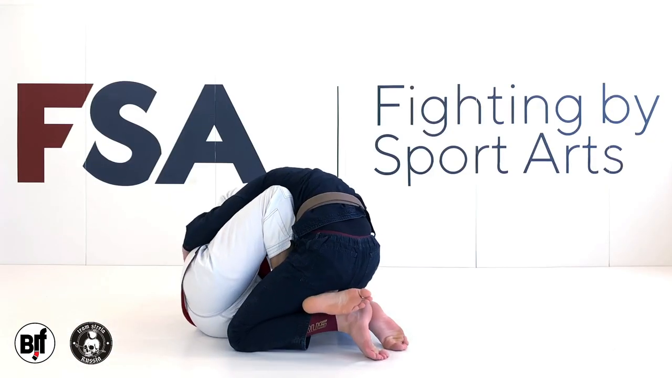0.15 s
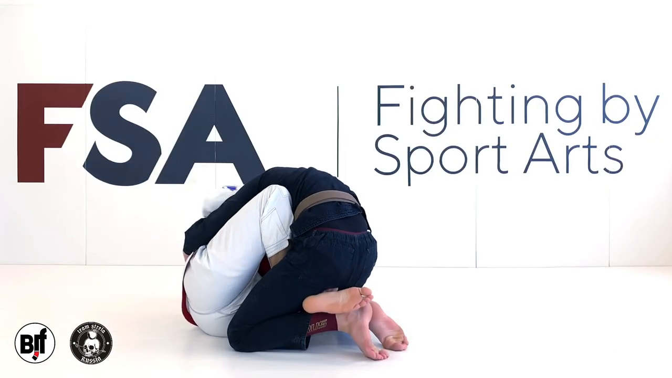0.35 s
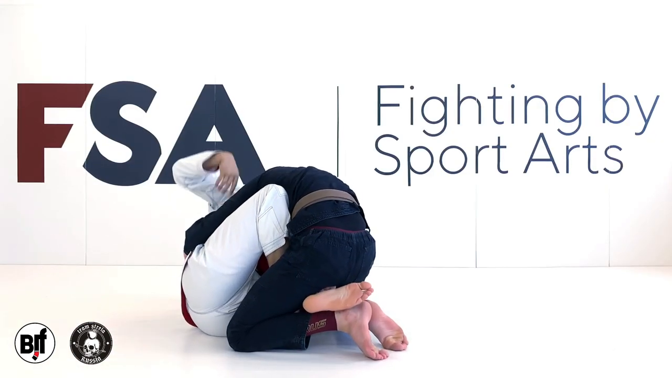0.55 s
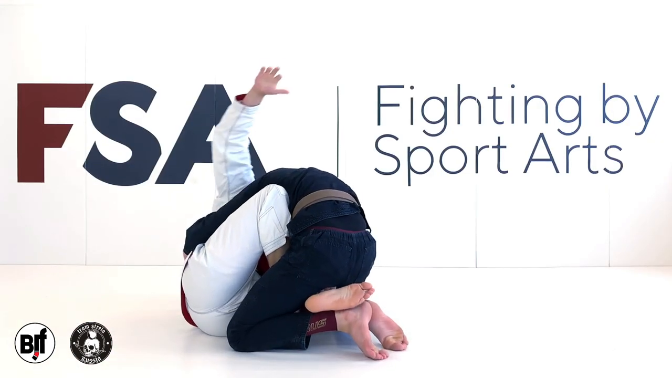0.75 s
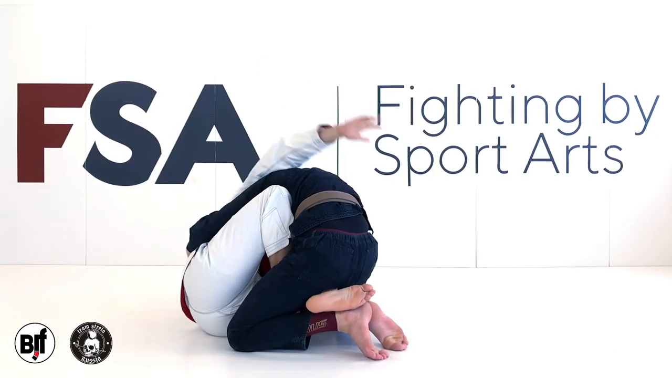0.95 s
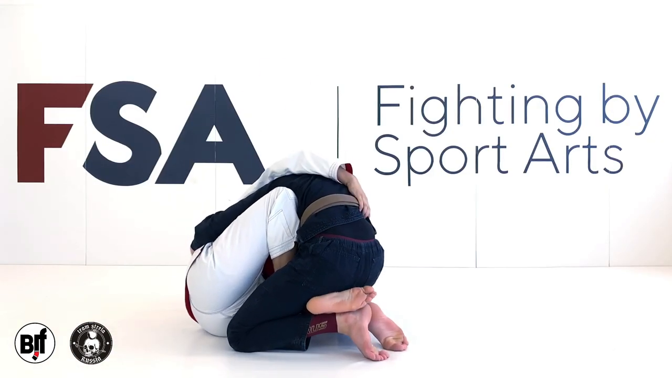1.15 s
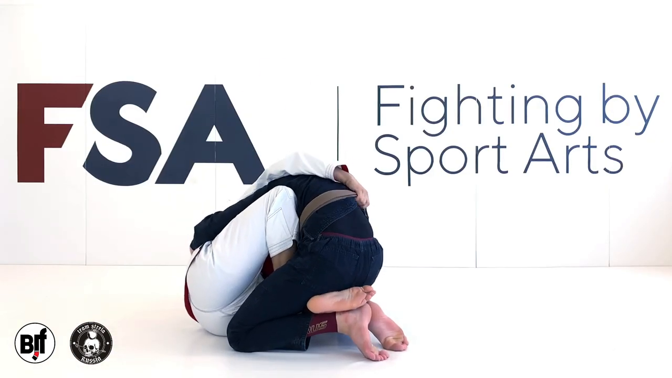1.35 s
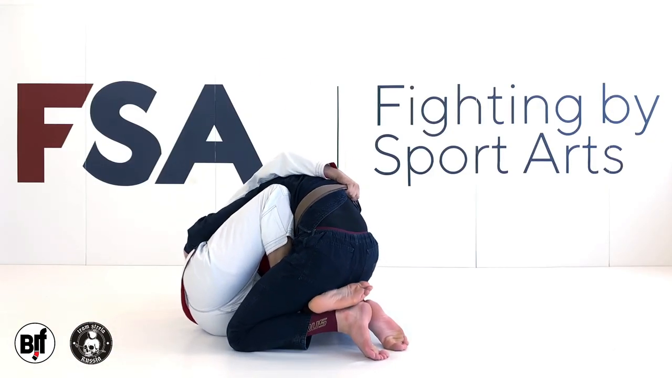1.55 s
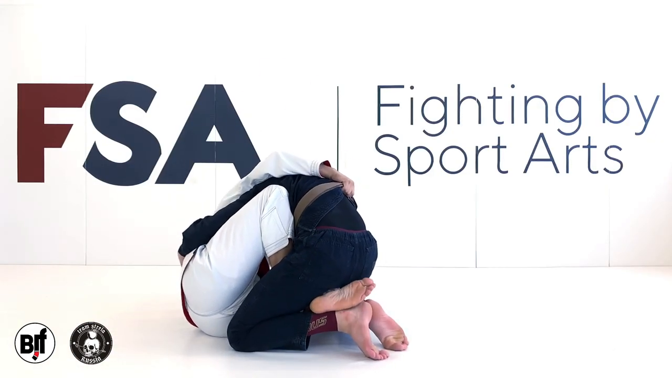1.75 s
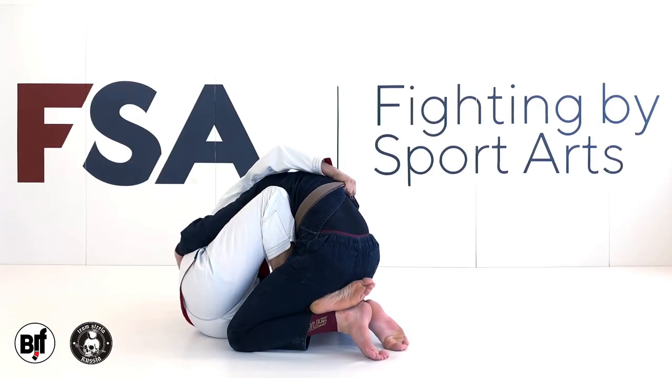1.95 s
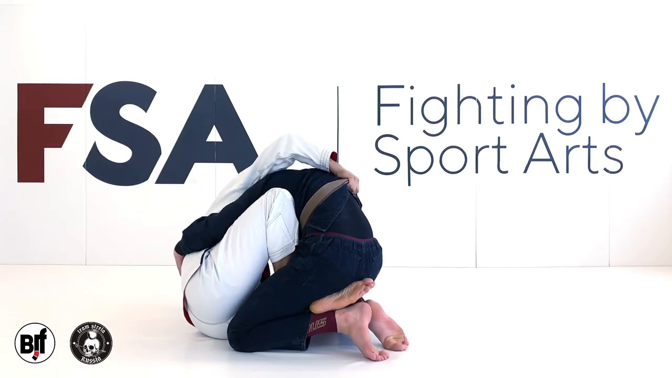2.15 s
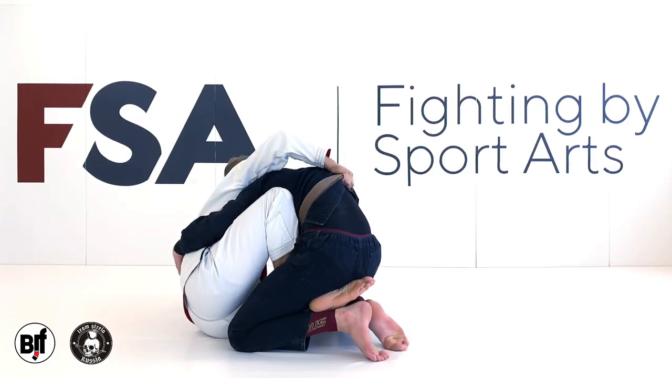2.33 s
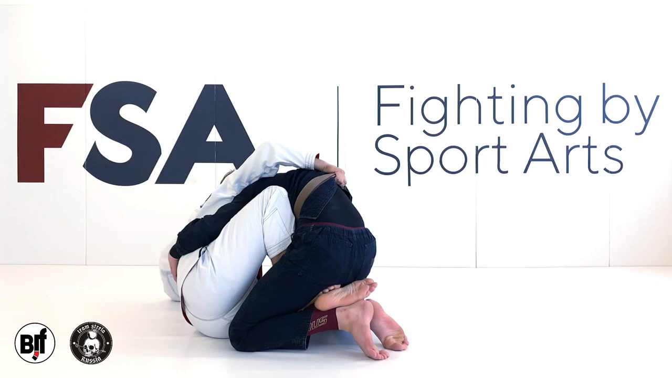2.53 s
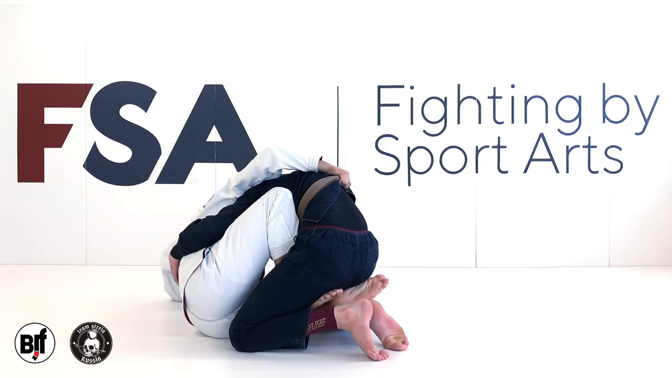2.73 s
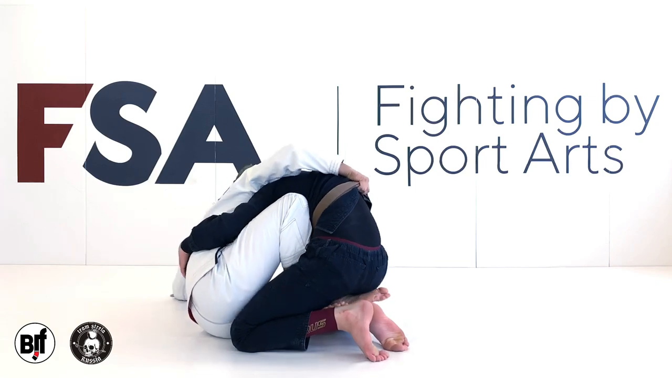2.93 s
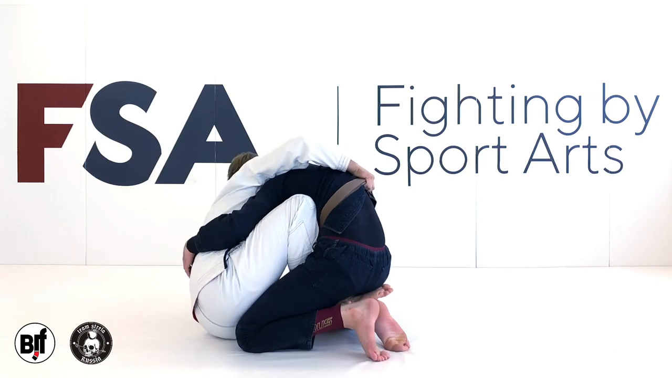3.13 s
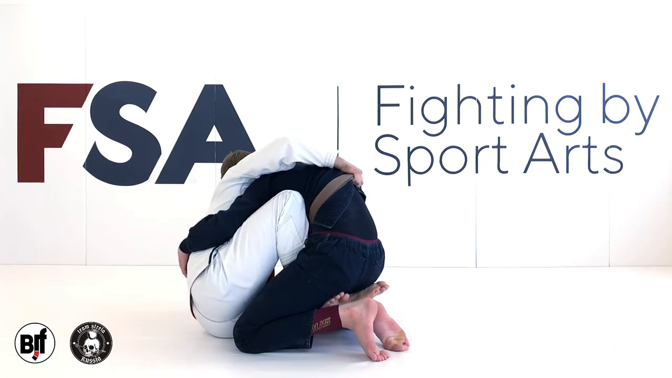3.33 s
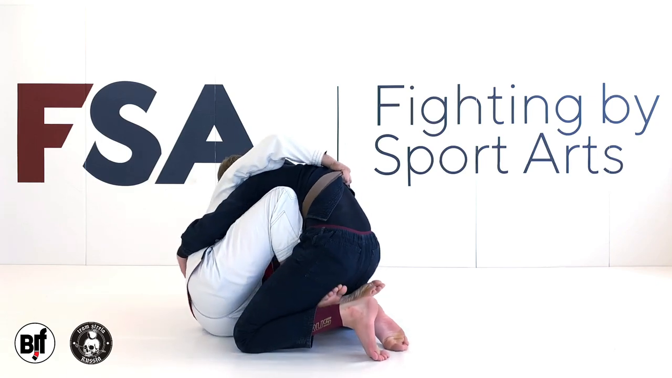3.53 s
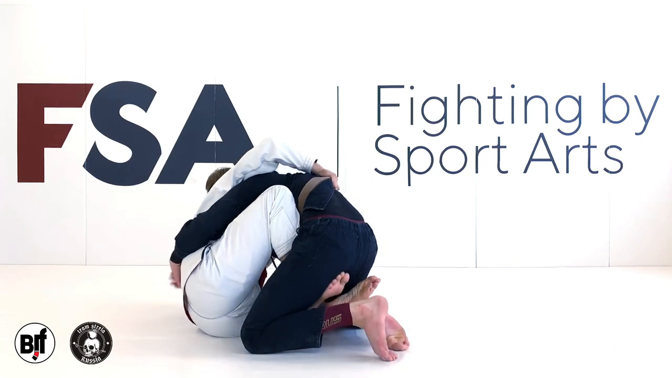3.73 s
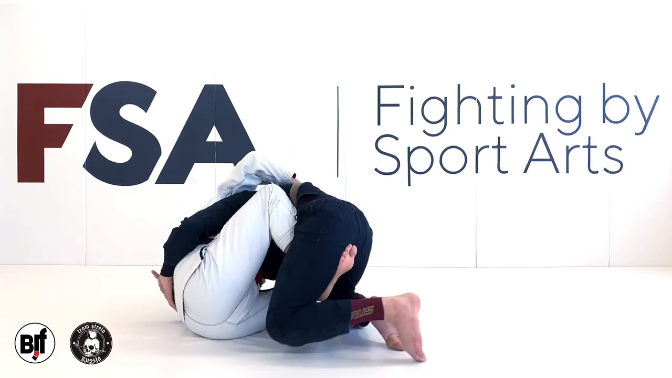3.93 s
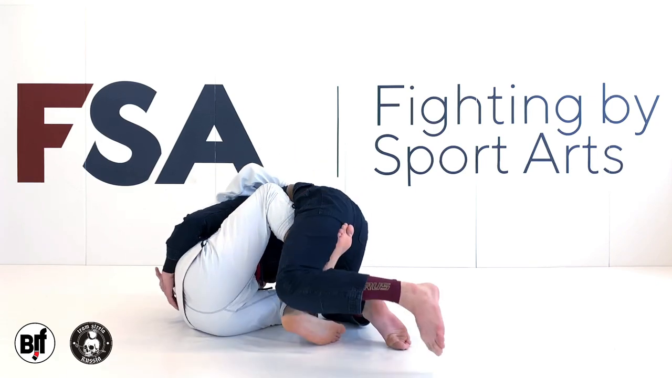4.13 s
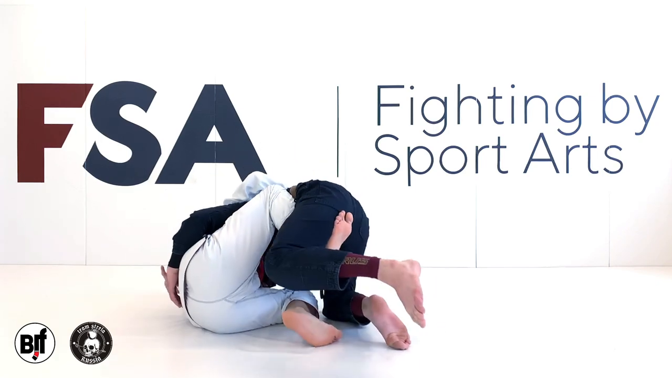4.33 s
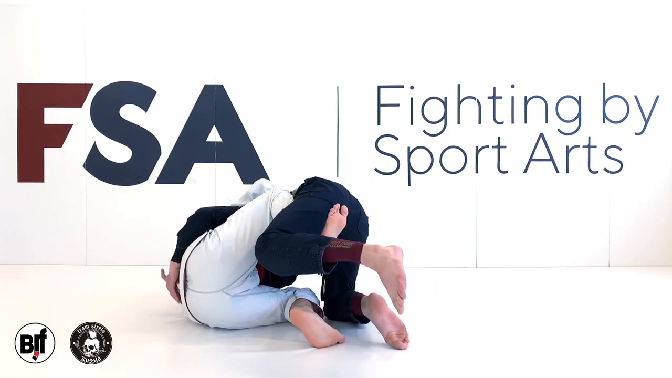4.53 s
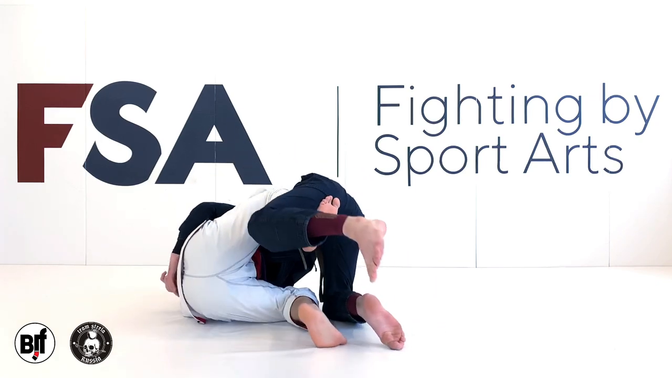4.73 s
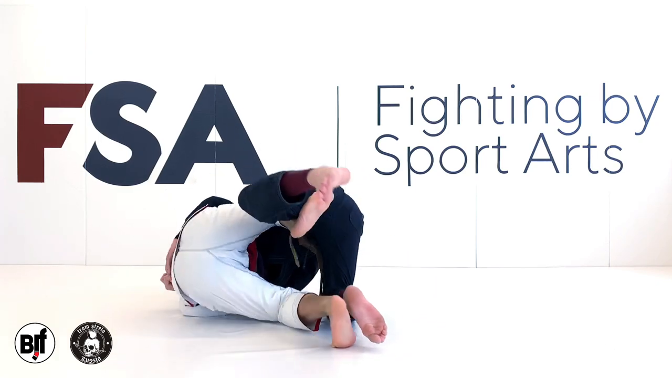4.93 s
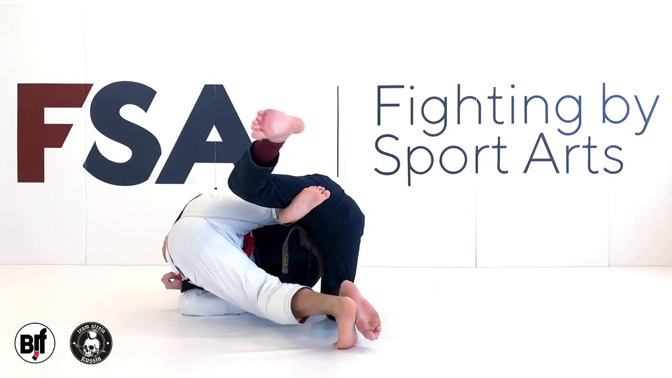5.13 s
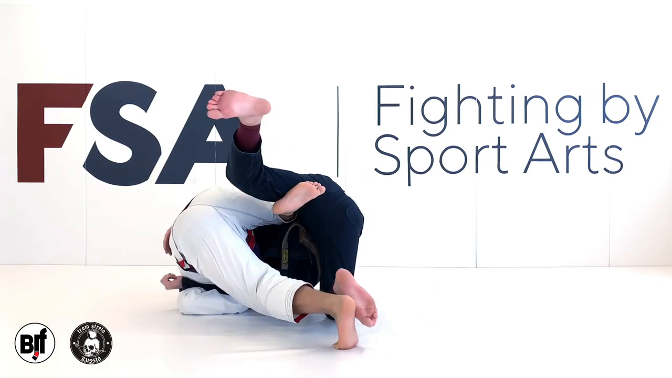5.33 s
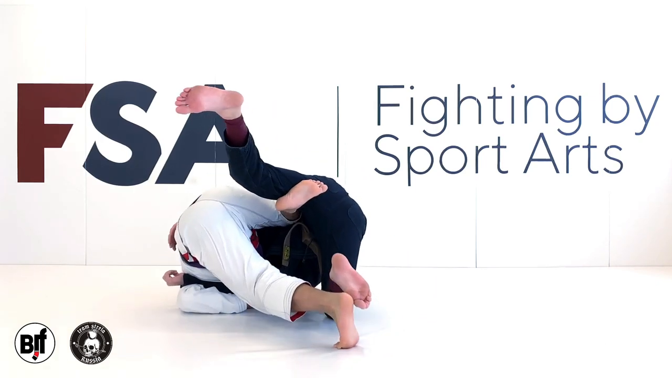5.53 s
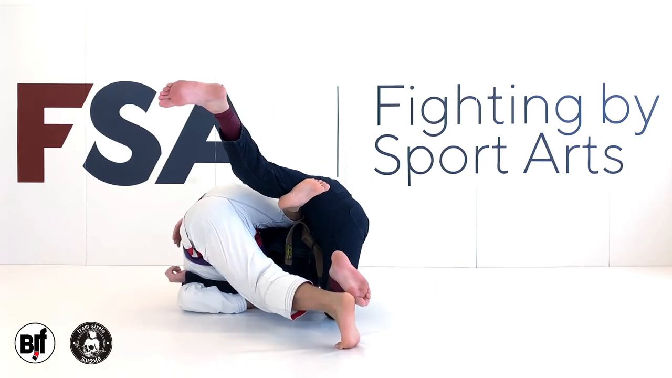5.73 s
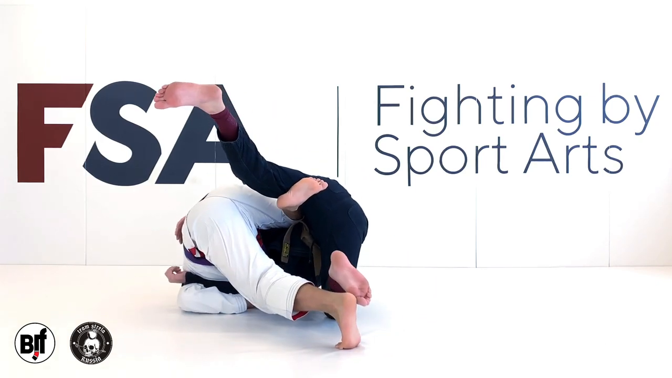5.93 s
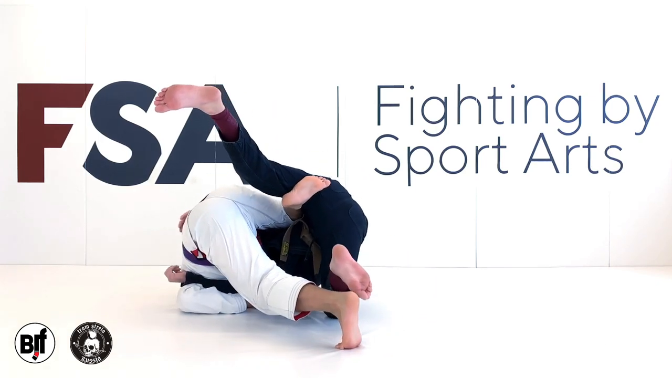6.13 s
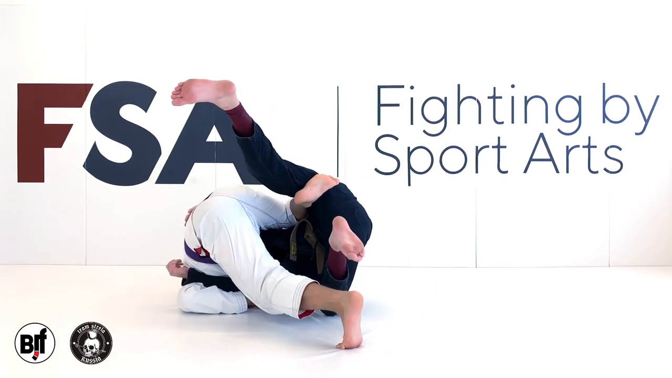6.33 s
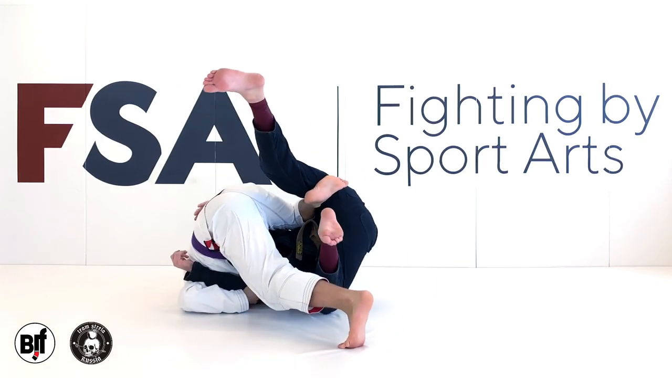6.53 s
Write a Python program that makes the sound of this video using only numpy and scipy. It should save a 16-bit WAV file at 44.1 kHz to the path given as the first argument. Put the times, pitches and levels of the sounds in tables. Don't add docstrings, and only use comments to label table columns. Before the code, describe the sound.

Faint air rush and low cloth rustle, then a sudden crisp slap of palm on thick jacket, ringing about a second off bare walls. After a lull, a foot slaps the mat softly, knees and hips thump dully, and fabric scrapes in bursts, strongest around four and five seconds. A tiny sticky snap and brief rising squeak lead into near stillness. Stereo, fairly close, in a live room.

```python
import sys
import numpy as np
from scipy import signal
from scipy.fft import rfft, irfft, next_fast_len
from scipy.io import wavfile
from scipy.ndimage import uniform_filter1d, map_coordinates

SR = 44100
rng = np.random.default_rng(int(sys.argv[2]) if len(sys.argv) > 2 else 0)


def store_pcm(level_fs):
    pcm = np.round(np.clip(level_fs, -1, 1) * 32767).astype(np.int16)
    wavfile.write(sys.argv[1], SR, np.atleast_2d(pcm).T)


def gain_from_db(level_db):
    decades = np.asarray(level_db, float) / 20
    return 10 ** decades


N = 290001


def unit(x):
    return x / np.sqrt(np.mean(x ** 2) + 1e-20)


def along(points, hz):
    f, v = np.transpose(points)
    return np.interp(np.log(hz + 1), np.log(f + 1), v)


def wobble(rate):
    knots = rng.standard_normal(int(N * rate / SR) + 4)
    return map_coordinates(knots, [np.arange(N) * rate / SR])


def filtered(x, response):
    n = x.shape[-1]
    m = next_fast_len(n + SR // 4)
    return irfft(rfft(x, m) * response(np.fft.rfftfreq(m, 1 / SR)), m)[..., :n]


# frequency in Hz, likeness from 0 to 1.
LIKENESS = [(50, 0.99), (130, 0.13), (400, 0.41), (3000, 0.33), (8000, 0.28), (15000, 0.66)]


def spread(pair, narrow):
    def mid_side_gains(hz):
        likeness = narrow + (1 - narrow) * along(LIKENESS, hz)
        angle = np.arccos(np.clip(likeness, -1, 1)) / 2
        return np.array([np.cos(angle), np.sin(angle)])

    mid, side = filtered(pair, mid_side_gains)
    return np.array([mid + side, mid - side])


def rush(spectrum, narrow, grain_db, grain_hz):
    grainy = rng.standard_normal((2, N)) * gain_from_db(grain_db * wobble(grain_hz))
    coloured = filtered(grainy, lambda hz: gain_from_db(along(spectrum, hz)))
    return unit(spread(coloured, narrow))


# frequency in Hz, level in dB per Hz.
VENT_COLOUR = [(12, -54), (20, -28), (74, 3), (137, -5.5), (197, -6), (284, -7.5), (386, -10.5),
               (456, -10.5), (571, -10), (1150, -13.5), (2310, -16.5), (14600, -32.5), (15800, -41)]


def ventilation():
    return gain_from_db(-64.1) * rush(VENT_COLOUR, .05, grain_db=.8, grain_hz=9)


def strokes(s, db, swell, fade, rest_db):
    t = np.arange(0, N / SR + .01, .002)
    late = t - s[:, None]
    drop_db = 10 * np.where(late < 0, -late / swell[:, None], late / fade[:, None])
    power = np.sum(gain_from_db(db[:, None] - drop_db) ** 2, axis=0) + gain_from_db(rest_db) ** 2
    return np.interp(np.arange(N) / SR, t, np.sqrt(power))


# peak time in seconds, creak level in dB,
# seconds to fade 10 dB, jacket folds over the creak in dB.
PRESSES = [(.01, -61, .1, 0), (.2, -60, .2, -18), (.45, -60, .14, 0), (.64, -62, .08, -8),
           (1.02, -63, .03, 0), (1.08, -62, .05, 2), (1.6, -65, .3, 0), (2.115, -62, .04, 10),
           (2.18, -43, .06, -11), (2.245, -56, .1, -1), (2.5, -53, .1, -25), (2.8, -59, .2, -8),
           (3.04, -57, .22, -1), (3.34, -58, .05, 0), (3.435, -53, .06, -3), (3.57, -55, .13, -10),
           (3.7, -56, .06, 7), (3.77, -45, .04, -5.5), (3.99, -54, .14, 0), (4.14, -61, .08, 2),
           (4.48, -65, .1, 2), (4.8, -56, .09, -12), (4.92, -61, .15, 6), (5.06, -55, .09, -4),
           (5.47, -64, .1, -2), (5.63, -59, .2, -9), (5.78, -69, .18, 6), (6.1, -67, .2, 2),
           (6.25, -60, .18, -5), (6.46, -54, .07, -23)]
# frequency in Hz, level in dB per Hz.
CREAK_COLOUR = [(24, -52), (40, -18.5), (146, 0.5), (248, -7), (377, -9), (432, -25.5), (600, -22.5),
                (780, -40), (1320, -120)]
FOLD_COLOUR = [(210, -28), (350, -0.5), (514, -6), (593, -4), (836, -4), (1800, -11.5), (2340, -40),
               (3960, -120)]


def pressing():
    s, db, fade, fold_db = np.transpose(PRESSES)
    swell = .6 * fade
    creak_gain = gain_from_db(-1.5) * strokes(s, db, swell, fade, rest_db=-69)
    fold_gain = gain_from_db(1.1) * strokes(s, db + fold_db, swell, fade, rest_db=-76)
    creak = creak_gain * rush(CREAK_COLOUR, 0.3, grain_db=2, grain_hz=26.2)
    fold = fold_gain * rush(FOLD_COLOUR, 0.13, grain_db=1.5, grain_hz=80.3)
    return creak + fold


# peak time in seconds, rasp level in dB,
# seconds to swell 10 dB, seconds to fade 10 dB, thread hiss over the rasp in dB.
SLIDES = [(.04, -58, .1, .18, -6), (.47, -59, .17, .18, -9), (1.03, -67, .03, .04, -18),
          (1.65, -60, .3, .15, -5), (2.07, -65, .06, .06, -7), (2.18, -52, .03, .05, -5),
          (2.25, -55, .03, .14, -6), (2.36, -64, .1, .15, 2), (2.7, -57.5, .15, .2, -8),
          (3.08, -57.5, .07, .14, 1.8), (3.34, -60.5, .05, .05, -5.5), (3.43, -61, .04, .1, -7),
          (3.545, -57, .035, .07, 8), (3.7, -55.5, .08, .08, -4), (3.79, -58, .05, .15, -5),
          (3.975, -51.5, .09, .2, -7.5), (4.45, -69, .06, .1, -10), (4.6, -62.5, .1, .08, -9),
          (4.95, -53, .1, .1, -6), (5.05, -49, .11, .13, -9), (5.42, -69, .1, .2, -3),
          (5.77, -65, .12, .3, -4), (6.15, -69, .2, .6, -5), (6.44, -70, .03, .03, 4)]
# frequency in Hz, level in dB per Hz.
WEAVE_COLOUR = [(710, -28), (1200, -3.5), (1760, 2), (2780, 1.5), (4940, -4.5), (6000, -8.5), (7800, -40.5),
                (13200, -120)]
THREAD_COLOUR = [(2120, -33.5), (3600, -4), (4360, -0.5), (8680, -6), (9410, -7), (13100, -13.5),
                 (15800, -19.5)]


def sliding():
    s, db, swell, fade, hiss_db = np.transpose(SLIDES)
    weave_gain = gain_from_db(-1.1) * strokes(s, db, swell, fade, rest_db=-80)
    hiss_gain = gain_from_db(.4) * strokes(s, db + hiss_db, swell, fade, rest_db=-84)
    weave = weave_gain * rush(WEAVE_COLOUR, 0.53, grain_db=1.5, grain_hz=151)
    hiss = hiss_gain * rush(THREAD_COLOUR, .4, grain_db=1.5, grain_hz=309)
    return weave + hiss


# frequency in Hz, seconds to die by 60 dB.
GYM_RING = [(60, 0.5), (200, 0.57), (600, 0.69), (1500, 1.08), (4000, 1.136), (8000, 0.93), (14000, 0.42)]
# frequency in Hz, level in dB.
GYM_TONE = [(60, 5), (250, -2), (1000, -1.5), (3000, -1.5), (8000, -0.5), (15000, 2.5)]


def gym(x):
    hz, t, z = signal.stft(rng.standard_normal((2, SR * 3 // 2)), SR, nperseg=256)
    level_db = along(GYM_TONE, hz)[:, None] - 60 * t / along(GYM_RING, hz)[:, None]
    tail = signal.istft(z * gain_from_db(level_db), SR, nperseg=256)[1]
    tail = spread(tail, 0.033)
    tail *= 1 - np.exp(-np.arange(tail.shape[1]) / SR / 0.0013)
    tail = tail / np.linalg.norm(tail[0])
    late = np.pad(x, round(.008 * SR))[None]
    return signal.fftconvolve(late, tail, axes=1)[:, :N]


def low_thumps(rows, puff_db, rise_s, rise_share, hold_cycles):
    out, t = np.zeros(N + SR), np.arange(SR // 2) / SR
    for s, db, hz, t60 in rows:
        rise = rise_s + rise_share * t60
        swell = np.sin(np.pi / 2 * np.minimum(t / rise, 1))
        ringing_for = np.maximum(t - rise - hold_cycles / hz, 0)
        shape = swell * gain_from_db(-60 * ringing_for / t60)
        noise = rng.standard_normal(len(t))
        puff = unit(filtered(noise, lambda f: f / (f + 0.81 * hz) / (1 + (f / (2.0 * hz)) ** 4)))
        tone = np.sin(2 * np.pi * hz * t)
        out[round(s * SR):][:len(t)] += gain_from_db(db) * shape * (tone + gain_from_db(puff_db) * puff)
    return out[:N]


# start in seconds, peak level in dB, pitch in Hz,
# seconds to die by 60 dB.
SHIFTS = [(.718, -59, 88, .18), (1.105, -42, 80, .22), (1.279, -54, 59.2, .3), (1.459, -60, 72, .39),
          (2.55, -43.5, 98.5, .27), (2.999, -48, 88, .3), (3.825, -58, 65.5, .25), (4.135, -56, 98, .46),
          (4.899, -56.5, 59.6, .3), (5.13, -50, 66, .45), (5.555, -59, 68, .34)]


def weight_shifts():
    return low_thumps(SHIFTS, puff_db=-2, rise_s=.02, rise_share=.07, hold_cycles=.2)


# start in seconds, peak level in dB,
# air pocket pitch in Hz, seconds to die by 60 dB, crack level over the pocket in dB.
TICKS = [(1.009, -55.5, 1510, .025, -6), (1.648, -42, 2540, .017, -14), (2.113, -41, 536, .048, -12),
         (2.173, -45.5, 936, .05, -2), (2.698, -55, 5100, .02, 6), (3.34, -45, 1680, .008, 1),
         (3.6447, -46.5, 800, .02, 5), (3.7669, -37, 595, .022, 0), (4.863, -41, 790, .015, -1),
         (3.695, -41, 700, .02, -2), (4.126, -47, 700, .02, -2), (5.217, -43.5, 2580, .012, -8),
         (6.434, -59, 553, .02, -2)]
FINGERS = [
    (1.0926, -37, 1810, .03, -3),
    (1.0947, -25, 2170, .012, -8),
    (1.0985, -35, 1700, .05, -2),
]
SLAP = [
    (1.1038, -37, 1520, .027, 8),
    (1.1067, -17, 1120, .016, -8.5),
    (1.11, -24, 800, .036, 0),
    (1.1107, -23, 350, .035, -12),
    (1.1125, -21, 2800, .012, -2),
    (1.1147, -7, 1200, .007, -5),
    (1.115, -8, 3800, .004, -7),
    (1.1157, -10, 3700, .004, -7),
]
SETTLE = [
    (1.1245, -26, 830, .02, 2),
    (1.127, -24, 6000, .01, -7),
    (1.134, -22, 5500, .008, 1),
    (1.137, -26, 4950, .008, 1),
    (1.139, -27, 6000, .0073, 2),
]
FOOT = [
    (2.516, -52, 1660, .039, 0),
    (2.526, -28, 700, .018, -15),
    (2.5294, -33, 356, .034, -10),
    (2.5405, -30, 1600, .03, -8),
    (2.5363, -27, 510, .045, -5.5),
    (2.5425, -30, 1000, .049, -4),
    (2.548, -25, 620, .016, -4.5),
    (2.552, -24, 537, .019, -14),
    (2.5596, -29, 600, .022, -11),
]
PEEL = [
    (5.3945, -41, 1290, .018, -8),
    (5.3945, -33, 3010, .01, -14),
    (5.4014, -25, 3100, .004, -12),
    (5.4083, -31, 4500, .003, 6),
    (5.4155, -40, 6000, .005, -3),
]


def contacts():
    groups = [(FINGERS, 9.5), (SLAP, -1.8), (SETTLE, -13), (FOOT, 1.7), (TICKS, -1.5), (PEEL, -2.3)]
    return [(*row, room_db) for rows, room_db in groups for row in rows]


# frequency in Hz, level in dB per Hz.
CRACK_COLOUR = [(200, 3), (600, -4), (1200, -.5), (2500, -4.5), (4000, -9.5), (7000, -14.5), (11000, -23),
                (14000, -29.5), (16000, -42)]


def crack_colour(f, pocket_hz):
    thin = 1 + (0.22 * pocket_hz / (f + 1)) ** 4
    bright = np.minimum(1 + f / 6000, 2.5) ** (pocket_hz / 3500)
    return gain_from_db(along(CRACK_COLOUR, f)) / thin * bright


def snaps():
    out, t = np.zeros((2, N + SR)), np.arange(SR // 8) / SR
    for s, db, hz, t60, sharp_db, _ in contacts():
        noise = rng.standard_normal((2, len(t)))
        mid, side = unit(filtered(noise, lambda f: crack_colour(f, hz)))
        crack = np.array([mid + 0.45 * side, mid - 0.32 * side])
        pocket = 0.74 * np.sin(2 * np.pi * hz * t)
        shape = (1 - np.exp(-t / 0.000214)) * gain_from_db(-60 * t / t60)
        out[:, round(s * SR):][:, :len(t)] += gain_from_db(db) * shape * (pocket + gain_from_db(sharp_db) * crack)
    return out[:, :N]


def snap_wash():
    hz, t, z = signal.stft(rng.standard_normal((2, N)), SR, nperseg=256)
    power = np.zeros(z.shape[1:])
    for s, db, pocket_hz, t60, sharp_db, room_db in contacts():
        pocket = 1 / (1 + (np.log((hz + 1) / pocket_hz) / 0.28) ** 4) / pocket_hz
        crack = crack_colour(hz, pocket_hz) ** 2
        colour = 0.38 * pocket / pocket.sum() + gain_from_db(2 * sharp_db) * crack / crack.sum()
        age = np.maximum(t - s - .006, 0)
        fade = (1 - np.exp(-age / .004)) * gain_from_db(-120 * age / along(GYM_RING, hz)[:, None])
        energy = t60 * gain_from_db(2 * (db + room_db + along(GYM_TONE, hz)))
        power += energy[:, None] * colour[:, None] * fade
    patches = uniform_filter1d(rng.standard_normal(power.shape), 4, 0)
    patches = unit(uniform_filter1d(patches, 12, 1))
    power *= gain_from_db(2.2 * patches)
    wash = signal.istft(z * np.sqrt(len(hz) * power), SR, nperseg=256)[1][:, :N]
    return spread(wash, 0.072)


# start in seconds, peak level in dB, mat pitch in Hz,
# seconds to die by 60 dB.
THUMPS = [(1.104, -29.5, 133, .055), (1.631, -53, 223, .074), (2.108, -46.5, 315, .078),
          (2.154, -39, 217, .056), (2.174, -36.5, 374, .093), (2.237, -38.5, 139.6, .2),
          (2.526, -30, 200, .04), (2.854, -35.5, 158, .07), (2.8793, -39, 158, .035),
          (2.899, -42, 148, .05), (3.537, -49, 150, .08), (3.007, -40.5, 187, .12), (3.034, -46, 370, .078),
          (3.428, -37.5, 138, .09), (3.686, -45.5, 177, .1), (3.7, -46, 326, .054),
          (3.766, -41.5, 298, .045), (3.968, -46, 416, .059), (4.12, -43, 200, .07), (4.463, -56, 301, .12),
          (4.786, -50, 290, .12), (4.862, -47, 152, .072), (4.881, -34, 167, .05), (4.975, -49, 290, .25),
          (5.045, -43, 160.6, .16), (5.109, -51, 277, .1), (5.158, -47.5, 140, .069),
          (5.502, -52, 170, .05), (5.611, -54.5, 300, .061), (6.428, -50, 149, .2)]


def body_thumps():
    return low_thumps(THUMPS, puff_db=-7.5, rise_s=.007, rise_share=.06, hold_cycles=1.1)


# time in seconds, pitch in Hz, level in dB.
SQUEAK = [
    (5.72, 405, -75),
    (5.78, 518, -61),
    (5.807, 570, -51),
    (5.825, 600, -66),
    (5.87, 680, -78),
]


def squeak():
    s, hz, db = np.transpose(SQUEAK)
    t = np.arange(N) / SR
    pitch = np.interp(t, s, hz) * (1 + 0.022 * wobble(60))
    turn = 2 * np.pi * np.cumsum(pitch) / SR
    return gain_from_db(np.interp(t, s, db, -140, -140)) * np.sin(turn)


def scene():
    rub = pressing() + sliding()
    low = weight_shifts() + body_thumps() + squeak()
    room = gain_from_db(-11) * gym(low) + gain_from_db(-1.0) * snap_wash() + gain_from_db(-6.5) * gym(rub[0])
    return gain_from_db(-3.1) * low + snaps() + rub + room + ventilation()


def band_limit(x):
    return signal.sosfilt(signal.butter(12, 15980, fs=SR, output="sos"), x)


def record(dry):
    mix = filtered(dry, lambda hz: 1 / (1 + (42 / (hz + 1)) ** 4))
    return band_limit(mix)


dry = scene()
out = record(dry)
store_pcm(out)
```